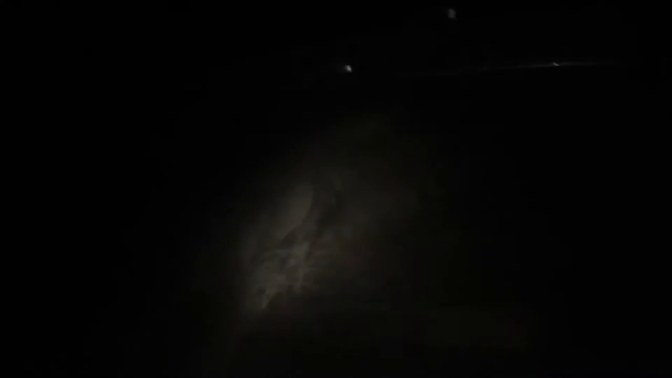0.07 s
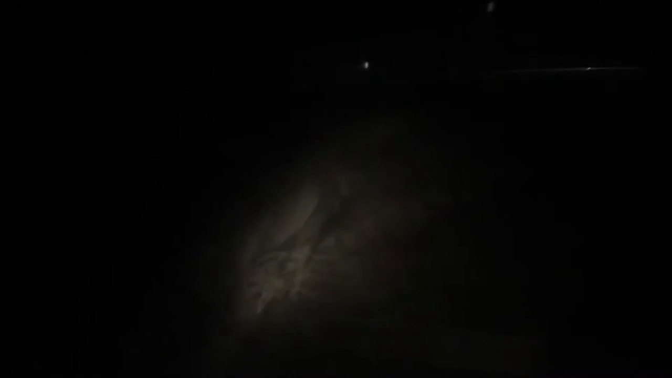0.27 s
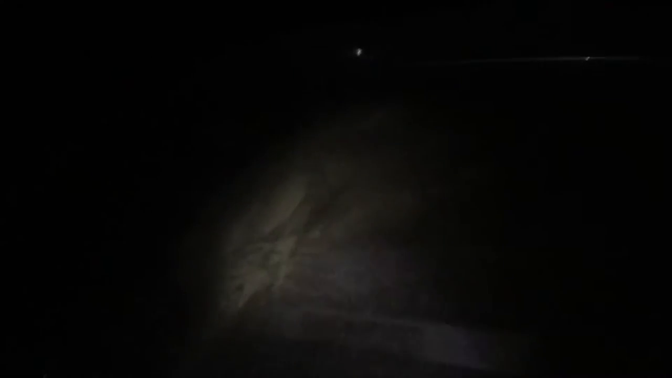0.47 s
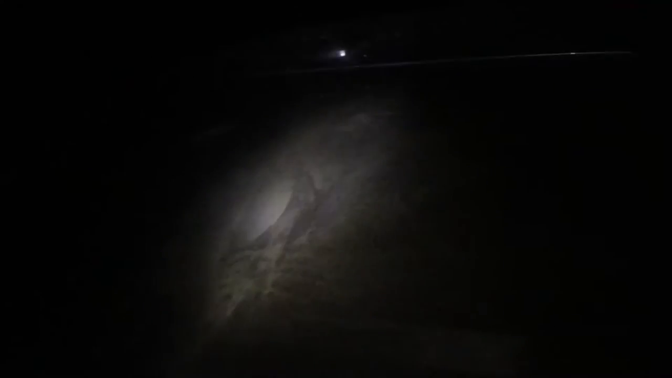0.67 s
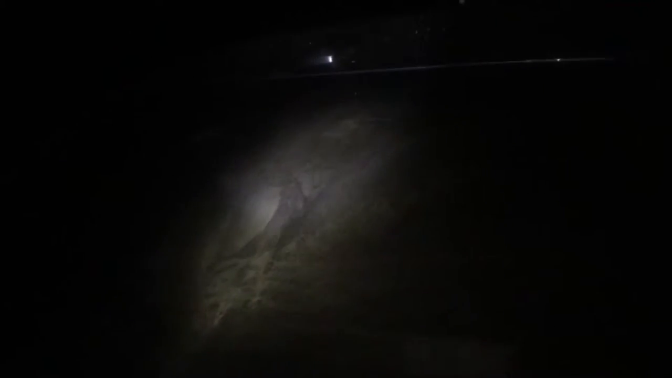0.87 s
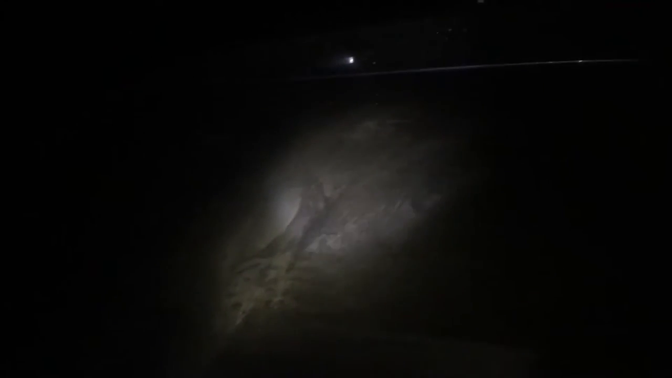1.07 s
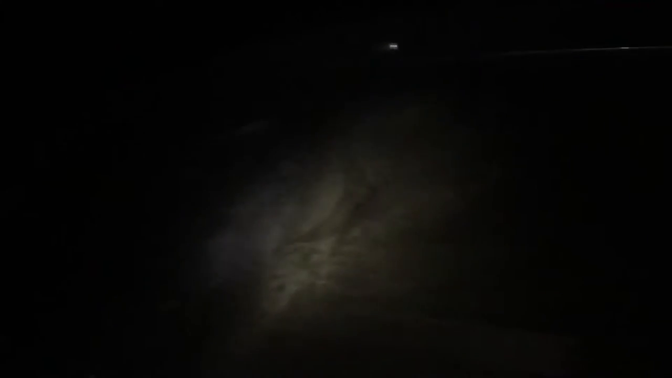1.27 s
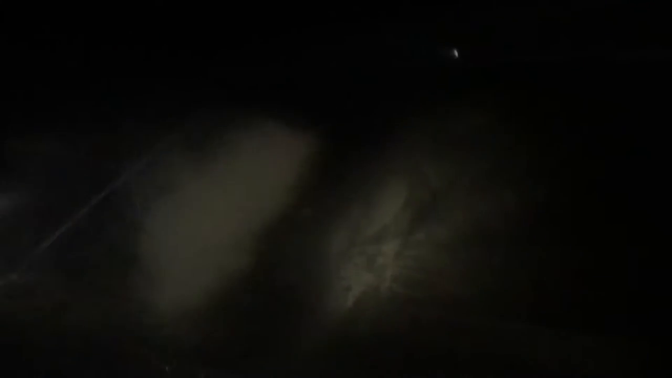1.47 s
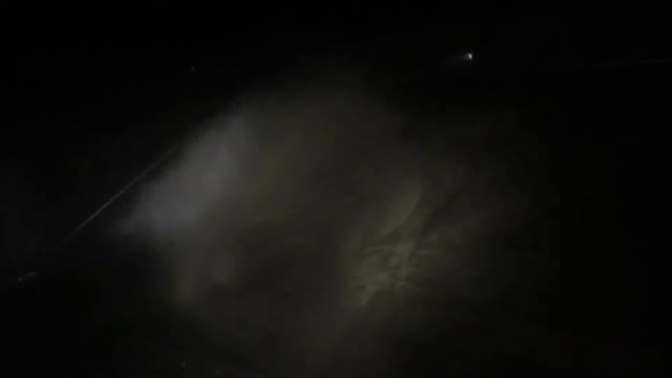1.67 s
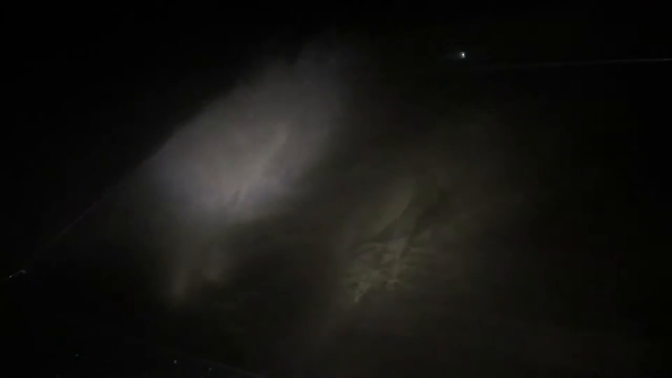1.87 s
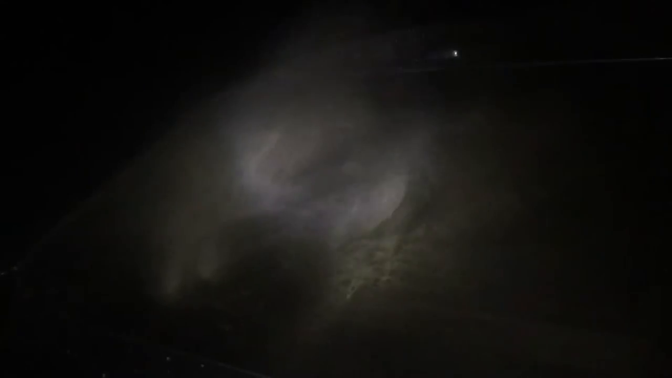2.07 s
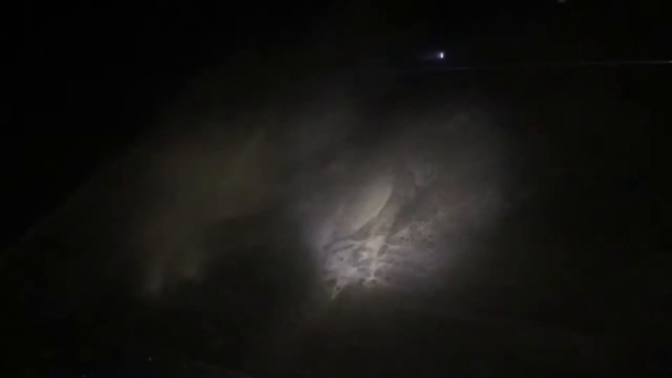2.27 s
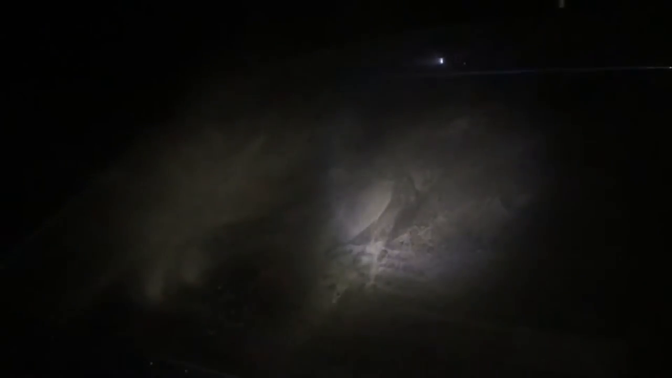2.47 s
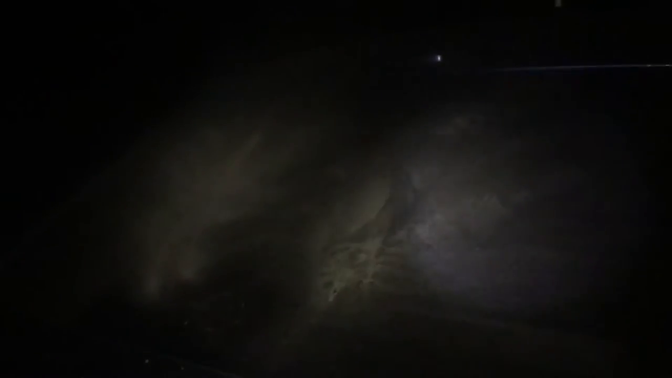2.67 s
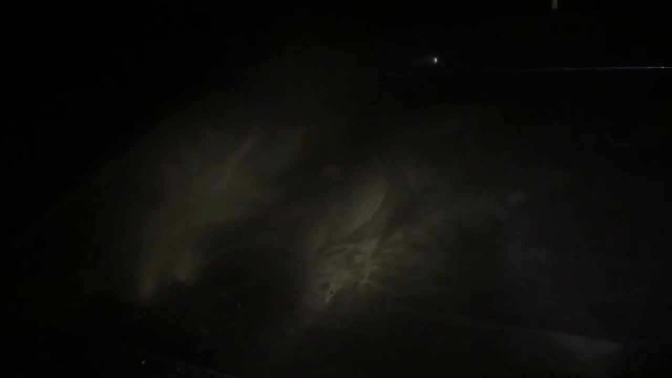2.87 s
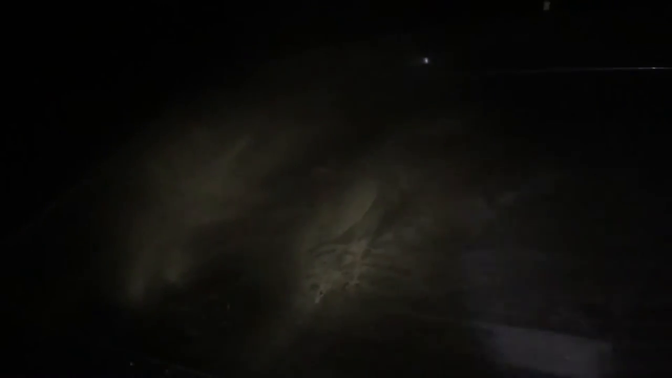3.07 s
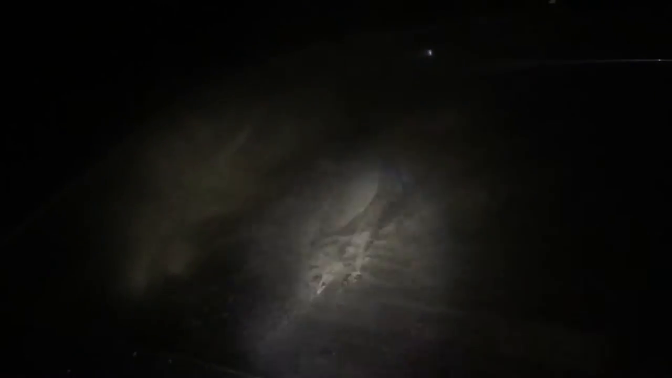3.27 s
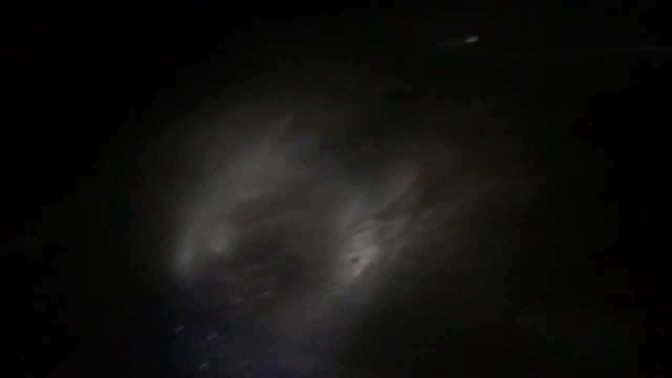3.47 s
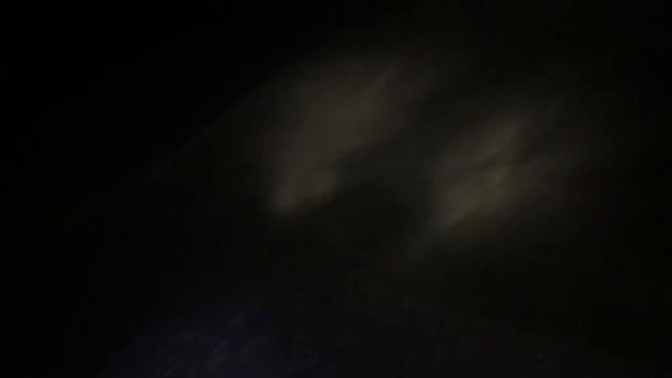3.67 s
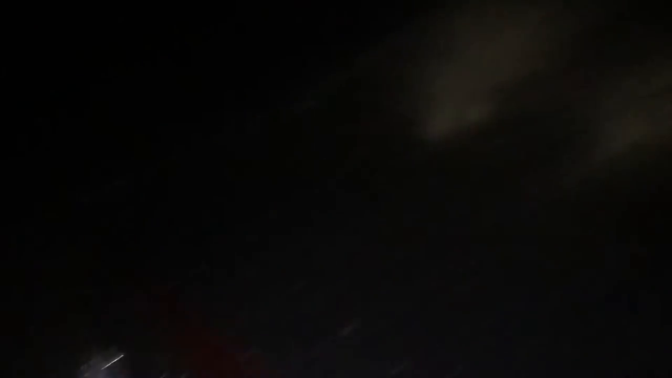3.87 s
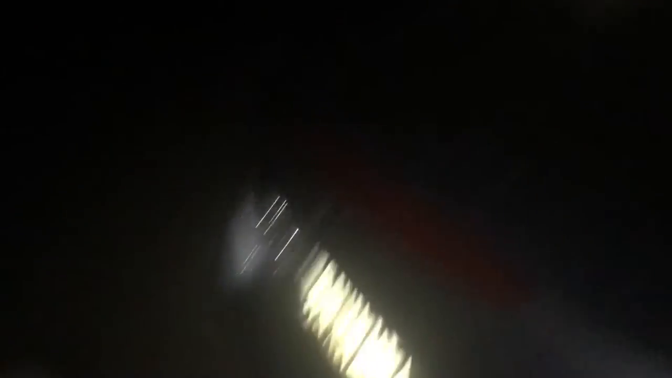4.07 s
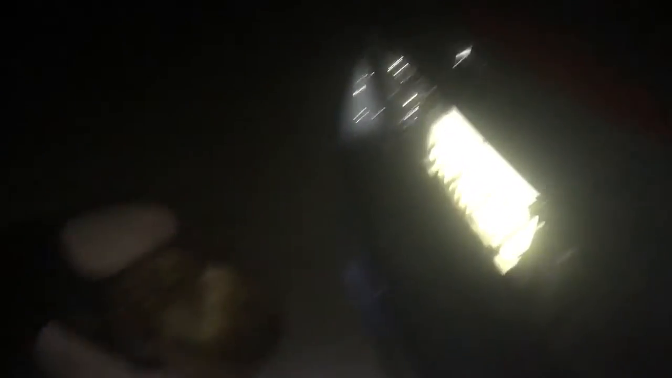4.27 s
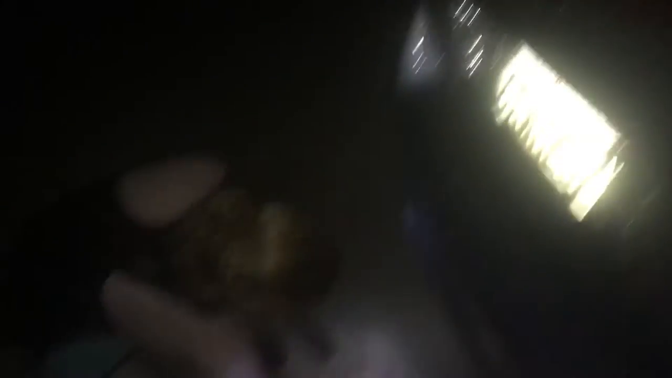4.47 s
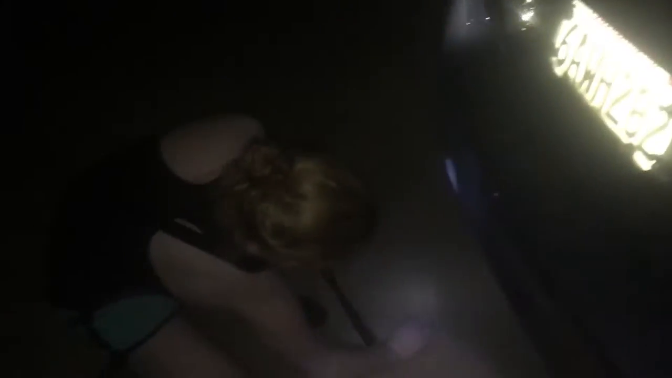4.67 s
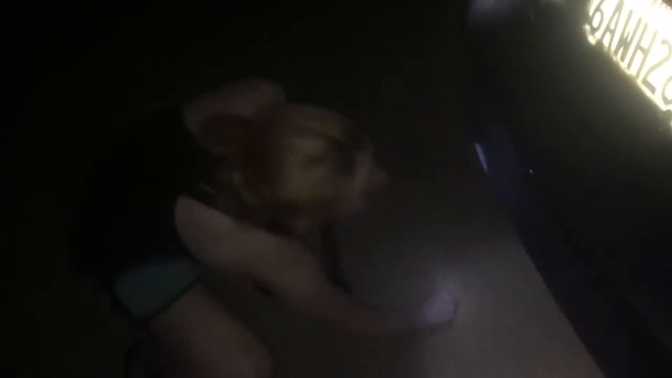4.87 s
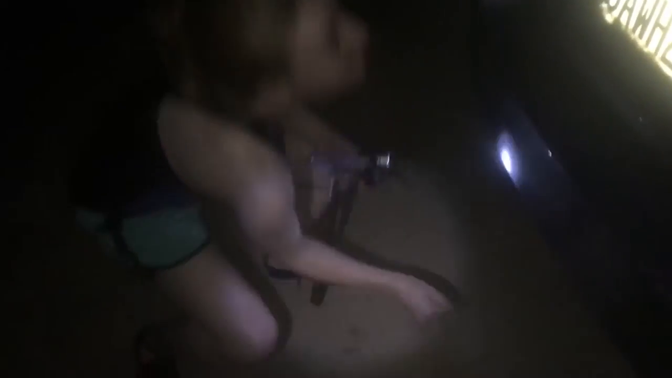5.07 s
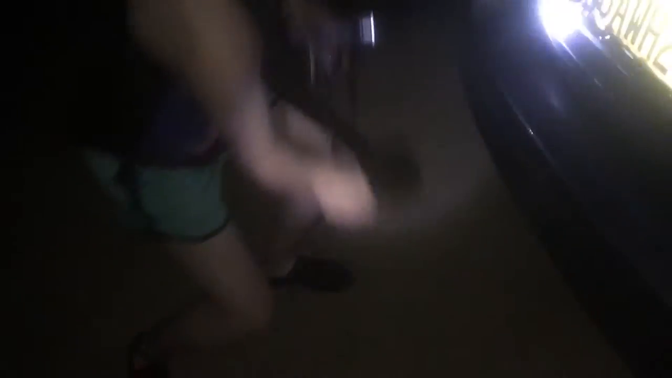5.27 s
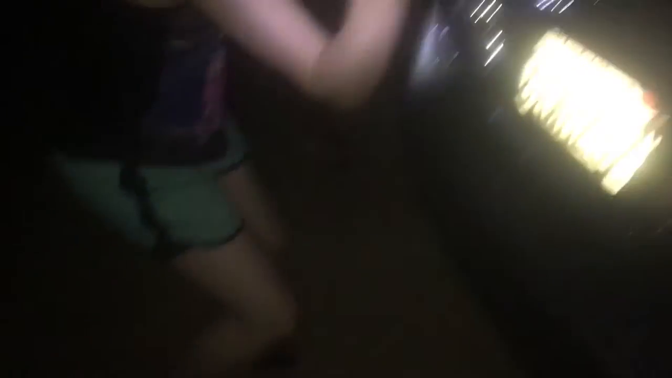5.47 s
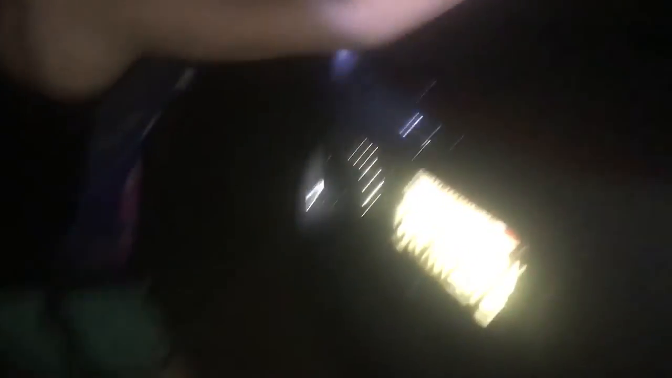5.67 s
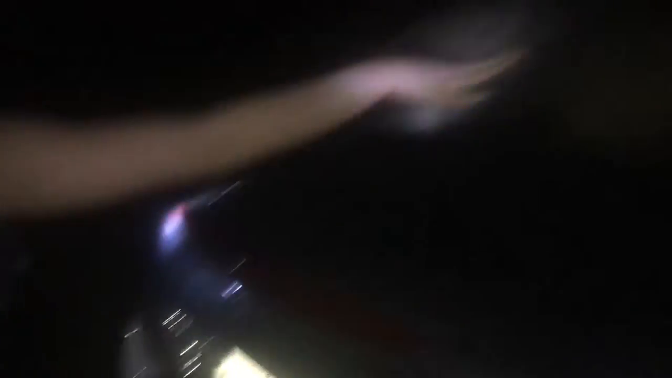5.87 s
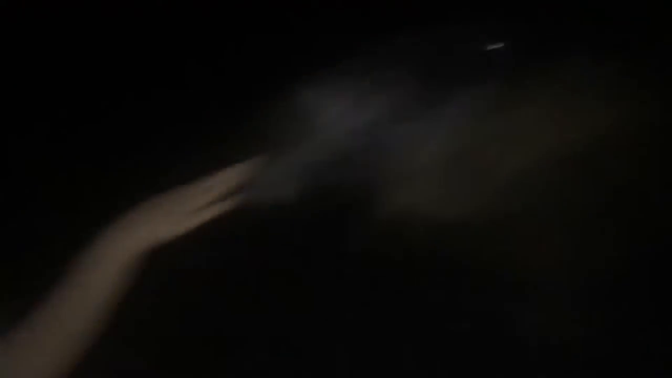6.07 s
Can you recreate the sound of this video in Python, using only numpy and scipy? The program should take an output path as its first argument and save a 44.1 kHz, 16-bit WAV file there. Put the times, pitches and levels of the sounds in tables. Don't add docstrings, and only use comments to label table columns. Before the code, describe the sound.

A quiet night outdoors, heard close: faint hiss, far traffic rumble and a low distant machine drone. At the very start a strap creaks in tiny hollow slips. Light scuffs follow, with stones snapping underfoot around 0.5 to 0.95 seconds and again at 1.2 to 1.35. At about 1.45 a handful of dry grit strikes a car panel: a bright, dense crackling burst over a soft thud and dull metal drumming. Sand hisses down, thinning from 1.6 to 3.4 with crumbs and specks ticking. From 3 to 5.4 a hand scrapes and scoops grit quietly, small stones clicking, especially near 4 and 5.3. Light rattles and scuffs lead to 5.84, when a second handful lands, more abrupt and harder, with a sharp knock, thud and bursting clods. Sandy hiss and scattered crumbs continue until the end, just after 6.1.

```python
import sys
import numpy as np
from scipy import signal
from scipy.fft import rfft, irfft, next_fast_len
from scipy.io import wavfile
from scipy.ndimage import uniform_filter1d, map_coordinates

SR = 44100
rng = np.random.default_rng(int(sys.argv[2]) if len(sys.argv) > 2 else 0)


def makeup_ratio(level_db):
    decades = np.asarray(level_db, float) / 20
    return 10 ** decades


def to_wav(sig):
    pcm = np.clip(np.atleast_2d(sig), -1, 1) * 32767
    pcm = np.round(pcm).astype(np.int16)
    wavfile.write(sys.argv[1], SR, pcm.T)


N = 269451

# frequency in Hz, level in dB per Hz.
NIGHT_COLOUR = [(20, -45), (35, -18), (55, -3.5), (80, -4.5), (120, -6.5), (170, -21.5), (250, -23),
                (420, -32.5), (3000, -47), (10000, -44.5), (16000, -52.5)]
# start in
# seconds, peak in dB, ring in Hz, T60 in seconds.
STRAP_SLIPS = [
    (0.0144, -35, 1160, 0.015),
    (0.0194, -26, 1350, 0.0063),
    (0.0229, -21.5, 1350, 0.0056),
    (0.0268, -29, 1410, 0.0042),
    (0.031, -34, 1170, 0.011),
    (0.038, -40, 1610, 0.011),
    (0.044, -38, 1490, .008),
    (0.0523, -26, 1350, 0.0053),
    (0.0595, -35, 900, .005),
    (5.7805, -36, 1090, 0.016),
]
# start
# in seconds, peak in dB, boom in Hz, T60 in seconds.
THUDS = [(1.005, -40, 430, 0.03), (1.468, -38, 96, 0.25), (1.49, -37.5, 390, 0.13), (2.45, -54, 45, 0.078),
         (2.56, -42.5, 53, 0.16), (3.098, -32.5, 57, 0.048), (3.4, -50, 59, .06), (3.885, -44, 57, 0.065),
         (3.78, -46, 70, .08), (3.7, -53, 110, 0.072), (3.255, -44.5, 242, 0.096),
         (5.39, -40.5, 705, 0.065), (5.845, -24, 116, 0.092), (5.847, -24, 3220, 0.015),
         (5.87, -40, 48, 0.3), (5.846, -35, 286, 0.12)]
# start in seconds, peak in dB, ring in Hz, spit of grit over it in dB.
TRODDEN_STONES = [(0.228, -43.5, 1370, -19), (0.5007, -30, 1700, -25), (0.5059, -28, 1800, -19),
                  (0.526, -38, 1660, -15), (0.565, -42, 1620, -26), (0.6047, -43.5, 1730, -4),
                  (0.625, -42.5, 1500, -18), (0.7, -36.5, 1840, -12), (0.719, -28.5, 1810, -14),
                  (0.7387, -23, 2100, -15.5), (0.744, -26.5, 1970, -9.5), (0.7558, -25, 1940, -10),
                  (0.787, -31, 1670, -6.5), (0.8101, -29, 1700, -17), (0.826, -37, 1880, -16),
                  (0.887, -39, 1770, -14), (0.9184, -49, 2010, 4.5), (0.951, -31.5, 2000, -10.5),
                  (1.2424, -33, 1710, -8), (1.267, -36, 1350, -10), (1.3053, -31, 1900, -22),
                  (1.3076, -22.5, 1380, -23.5), (1.3117, -43, 1250, -20), (1.3145, -41, 1650, -20),
                  (1.324, -38, 1900, -21), (1.3263, -25.5, 1320, -29), (1.3292, -30, 1560, -30),
                  (1.3378, -39, 1800, -21), (1.172, -54, 1800, -3), (1.351, -49, 1700, -12),
                  (1.4755, -25, 1480, -30), (1.483, -30, 1530, -31), (1.495, -27, 1330, -30),
                  (1.609, -36, 1440, -32), (1.618, -33.5, 1490, -30), (1.344, -36, 1580, -31),
                  (1.364, -48, 1500, -24), (1.377, -44, 1490, -20)]
# start in
# seconds, peak in dB, ring in Hz, spit of grit over it in dB.
SCOOPED_STONES = [(3.11, -31, 2360, -4), (3.858, -41.5, 1110, -17), (3.862, -39, 1460, -20),
                  (3.936, -37, 2100, -11), (3.952, -32, 1630, -21), (3.9714, -37, 1330, -22),
                  (3.98, -38.5, 920, -20), (3.9895, -31, 1920, -19), (4.1769, -34, 1580, -13),
                  (4.7524, -30, 2290, -15), (4.7935, -30, 2380, -21), (3.012, -38.5, 1090, -20),
                  (3.2082, -34, 2200, -17), (3.2557, -29, 2700, -20), (3.259, -45, 1010, -20),
                  (3.263, -48, 900, -20), (3.274, -41, 2200, -20), (5.0296, -46, 1200, -2.5),
                  (5.092, -55.5, 1490, 10.5), (5.107, -64.5, 1510, 18), (5.2762, -40, 1610, -10),
                  (5.268, -47, 1290, -19), (5.2778, -35, 2300, -12), (5.2795, -49, 1110, -11),
                  (5.308, -35, 2300, -20), (5.331, -36, 2200, -20), (5.339, -36, 2600, -15),
                  (5.348, -45, 1900, -12), (5.359, -56, 1400, -15), (5.298, -23.5, 1800, -22),
                  (5.301, -39, 1870, -24), (5.343, -46, 1500, -15), (5.364, -42.5, 2500, -4),
                  (5.4, -49, 746, -20), (5.42, -45.5, 750, -17), (5.321, -37, 1630, -15),
                  (5.3269, -30.5, 1750, -15), (5.376, -35.5, 1990, -3)]
# start in seconds, peak in dB, ring in Hz, spit over it in dB.
SWUNG_STONES = [(5.569, -45, 1230, -5), (5.584, -53.5, 1300, 10), (5.6067, -45, 1120, -8),
                (5.664, -51, 1500, 3), (5.732, -30, 2100, -18), (5.7545, -33, 1950, -23),
                (5.781, -40, 1900, -23), (5.899, -29, 1190, -25), (6.035, -34, 1500, -25),
                (6.0077, -33.5, 1100, -25), (5.7185, -47, 1500, -15), (5.722, -37, 2100, -15),
                (5.798, -45, 1900, -17), (5.812, -46, 1500, -14), (5.846, -14, 2660, -24),
                (5.973, -33, 2240, -20), (6.0069, -23, 1980, 0), (5.77, -55, 1650, 8),
                (6.054, -20, 1810, -30)]
# start in seconds, length in seconds, level in dB, grit over it in dB.
SCUFFS = [(0.0, 0.052, -54.5, -6.5), (0.155, 0.021, -57.5, -17), (0.276, 0.024, -60.5, -6),
          (0.323, 0.061, -58.5, -9.5), (0.498, 0.0078, -49.5, -28), (0.699, .015, -58.5, -15),
          (0.718, 0.036, -51, -8), (0.745, 0.048, -47.5, -10.5), (0.93, 0.039, -59.5, -7),
          (0.9, 0.035, -72, -5), (0.989, 0.019, -61, -2), (1.191, 0.016, -47, -11.5),
          (1.223, 0.028, -47.5, -12.5), (1.29, 0.038, -61, -7), (3.255, 0.0065, -48, -6),
          (3.526, 0.08, -62.5, 4), (3.857, 0.013, -55, -10), (3.921, 0.02, -54, -12),
          (3.965, 0.047, -51, -23), (4.091, 0.092, -52, -22), (4.245, 0.11, -53, -25),
          (4.39, 0.057, -57, -25), (4.684, 0.021, -63, -25), (4.882, 0.042, -62, -16),
          (5.065, 0.046, -64, -0.5), (5.235, 0.1, -62, -4.5), (5.34, 0.036, -62, -6.5),
          (5.383, 0.035, -48, -2.5), (5.568, 0.035, -58.5, -12), (5.717, 0.0066, -53.5, -7),
          (5.706, 0.047, -59, -4), (5.775, 0.021, -46.5, -11)]
# time in seconds, level in dB.
STIR = [(0, -60.5), (.45, -62.5), (.69, -68), (.9, -68), (1.1, -73.5), (1.43, -68.5), (3.4, -61),
        (3.8, -59), (4.8, -62.5), (5, -67), (5.18, -70.5), (5.5, -67.5), (5.83, -64)]
# frequency in Hz, level in dB per Hz.
SCUFF_COLOUR = [(60, -73), (150, -13.5), (300, -2), (600, -6), (1000, -2), (1750, -1.5), (2500, -1),
                (3700, -10.5), (7000, -43.5)]
# time in seconds, flow in dB, coarse sand over fine in dB.
SAND_FLOWS = [
    [(1.47, -51, -22), (1.62, -39.5, -11.5), (1.82, -39.5, -7), (2.23, -44.5, -8.5), (2.58, -45.5, -1.5),
     (3.15, -56.5, 1), (3.4, -62.5, -2), (3.5, -73, 7)],
    [(3.4, -60.5, -31), (3.52, -59.5, 5), (3.82, -61, -2), (4.03, -57.5, 1.5), (4.2, -50, -7),
     (4.47, -53.5, 3), (4.52, -61.5, 2), (4.66, -55.5, 2), (4.81, -56.5, 3.5), (4.865, -55.5, 1),
     (4.89, -76, 7), (4.97, -70.5, 5)],
    [(5.85, -53, -6), (5.89, -33.5, -12), (5.95, -37.5, -2), (6.03, -45.5, -6.5), (6.08, -43.5, -1),
     (6.11, -45.5, -8)],
]
# dust at the start in dB, dust at the end in dB.
FLOW_DUST = [(-10.5, -2), (-5.5, -9), (-17, -11)]
# frequency in Hz, level in dB per Hz.
SLIDE_COLOUR = [(150, -19.5), (280, -7), (520, -8.5), (1000, -3), (1500, -3.5), (2300, 0), (3000, -4),
                (4500, -14.5), (7000, -51)]
# start in seconds, peak in dB, centre in Hz, knock over it in dB.
CRUMBS = [(1.7454, -29, 5920, -22), (1.766, -26, 6620, -20), (1.792, -27, 7000, -18),
          (1.824, -18, 6600, -25), (1.852, -27.5, 7020, -24), (1.9216, -28, 5660, -10),
          (1.9336, -27.5, 5860, -14), (1.946, -31, 8550, -5), (1.983, -29.5, 6530, -20),
          (2.046, -26, 5470, -25), (2.059, -27, 6000, -13), (2.162, -31.5, 5500, -18),
          (2.304, -26.5, 6260, -7), (2.308, -28, 6000, -12), (2.3764, -27, 6150, -23),
          (2.4651, -30.5, 6450, -20), (2.49, -27, 6600, -20), (2.546, -26, 7960, -3),
          (2.627, -26.5, 8890, -14), (2.7064, -27, 8500, -20), (2.717, -28.5, 5830, -20),
          (2.758, -32.5, 5800, -18), (2.9285, -27.5, 8250, -11), (3.073, -33.5, 9500, -18),
          (3.081, -35.5, 6000, 0.5), (3.0963, -37, 7000, -10), (3.179, -39, 6050, -10),
          (3.255, -33, 6040, 4.5), (3.325, -40, 9000, -20), (3.404, -38.5, 6000, 0),
          (3.4155, -33, 9500, -18)]
# start in seconds, peak in dB, centre in Hz.
SPECKS = [(0.5231, -49, 9000), (0.54, -59, 8000), (0.5575, -51, 11000), (0.5849, -58, 9000),
          (0.6046, -56, 9000), (0.637, -54, 3500), (0.8493, -52, 6000), (0.876, -56, 7000),
          (0.909, -51, 8000), (0.925, -54, 7000), (1.693, -24, 5540), (1.703, -24.5, 6500),
          (1.713, -26, 6000), (1.7344, -30, 5460), (1.797, -23.5, 6000), (1.869, -30, 6500),
          (1.913, -28.5, 6000), (1.941, -25, 6000), (1.995, -40, 6500), (2.11, -36, 5000),
          (2.313, -29, 6000), (2.398, -42, 5000), (2.438, -36, 7000), (2.548, -36, 9000),
          (2.6654, -35, 7000), (2.791, -34, 9000), (2.8225, -37.5, 9000), (2.843, -36, 11000),
          (2.8993, -35, 11400), (2.905, -38, 6000), (2.968, -43, 7000), (3.0003, -34.5, 8470),
          (3.055, -42, 4500), (3.163, -43.5, 3500), (3.19, -42, 11000), (3.164, -39, 8000),
          (3.009, -38, 10000), (3.202, -53, 5000), (3.21, -37.5, 5800), (3.2443, -45, 5270),
          (3.318, -37, 12000), (3.3273, -33.5, 4530), (3.368, -52, 5500), (3.5015, -40.5, 6890),
          (4.371, -39, 9000), (4.438, -47, 9000), (4.5101, -48, 9000), (4.528, -42.5, 4000),
          (4.55, -45, 9000), (4.8997, -52, 2440), (4.921, -51, 4970), (1.298, -50, 3300),
          (1.395, -56, 4500), (1.2585, -55, 5500), (3.408, -42, 3350), (5.527, -51, 12000),
          (5.77, -43, 9970), (5.7885, -50.5, 9000), (5.33, -50, 4500), (5.348, -50, 4000),
          (1.3375, -61, 2980)]
# start in seconds, length in seconds, grit in dB, finest dust over grit in dB.
THROWS = [
    (1.445, .01, -44.5, -6),
    (1.454, 0.013, -31, -7.5),
    (1.463, 0.043, -25, -10),
    (1.493, 0.048, -29, -7.5),
    (5.8415, .002, -37, -1),
    (5.8439, 0.0054, -20.5, -20),
]
# frequency in Hz, level in dB per Hz.
GRIT_COLOUR = [(600, -80), (1500, -35.5), (2900, -10.5), (4000, -7), (5500, 0), (7500, -3), (9400, -1.5),
               (10500, -3), (12500, -49)]
# frequency in Hz, level in dB per Hz.
DUST_COLOUR = [(8000, -48), (10300, 1.5), (11500, -1.5), (13000, -2), (15500, -5.5), (16000, -9.5)]
# frequency in Hz, level in dB per Hz.
BOOM_COLOUR = [(40, -71), (80, -38), (130, 1.5), (240, -1), (400, 4), (600, -29.5), (1000, -18.5),
               (3000, -83)]
# start in seconds, peak in dB, centre in Hz, fall-off at one octave in dB.
CLODS = [(1.454, -29.5, 6500, 2), (1.459, -14.5, 7530, 16.5), (1.473, -9.5, 7470, 18),
         (1.4806, -12, 7640, 16), (1.4915, -13, 7340, 16), (1.5002, -9.5, 7270, 13.5),
         (1.5105, -18, 6520, 15), (1.5305, -27, 7060, 9.5), (1.5232, -20, 6640, 19.5),
         (1.5514, -18, 6960, 11), (1.5906, -32, 5900, 10.5), (1.6142, -21, 6400, 12.5),
         (1.6262, -24, 6440, 10.5), (1.6685, -23.5, 6730, 14.5), (1.677, -29.5, 6520, 7),
         (2.0927, -31, 5570, 18), (2.606, -31, 5600, 8.5), (3.265, -35, 4960, 6), (4.0234, -41, 8000, 11),
         (5.8408, -36, 6000, 1), (5.8437, -26, 6500, 6), (5.8445, -19, 2800, 19.5), (5.8495, -16, 2900, 17),
         (5.8535, -23, 2930, 22), (5.8462, -7.5, 6000, 18), (5.8478, -8.5, 6140, 14.5),
         (5.8505, -20.5, 3360, 26), (5.856, -14, 4000, 17), (5.864, -27.5, 6000, 8),
         (5.891, -24.5, 5500, 9), (5.939, -25.5, 8000, 2), (5.956, -35, 9000, 6), (5.986, -31.5, 8000, 5),
         (5.913, -13.5, 5140, 9), (5.9251, -20.5, 7600, 9), (5.9725, -19.5, 5280, 7.5),
         (6.0063, -31, 5450, 5.5), (6.0396, -32, 6140, 23), (6.0558, -28, 6430, 22),
         (6.0739, -16.5, 5750, 12), (6.0855, -16.5, 6000, 47), (6.1081, -22, 6830, 13)]
# frequency in Hz, level in dB.
MIC_PORT = [(25, -8), (45, 0), (2300, -1.5), (2900, -3), (3800, 1.5), (9500, -3.5), (10400, -8.5),
            (11300, -0.5)]

THROW_RISE_DB_S, THROW_FALL_DB_S = 13999, 331.5
SCUFF_RISE_DB_S, SCUFF_FALL_DB_S = 1600, 658
THROW_COARSE_DB = -14.5
STIR_GRIT_DB, SCUFF_DUST_DB, STIR_DUST_DB = -5.5, -9.5, -8.5
CRUMB_SLOPE_DB, SPIT_SLOPE_DB, SPECK_SLOPE_DB = 11, 6, 7.5
CRUMB_RING_HZ, SPIT_HZ = 2100, 4700
SNAP_CYCLES = 5


def unit(x):
    return x / np.sqrt(np.mean(x ** 2) + 1e-20)


def gain(points, f):
    hz, db = np.transpose(points)
    return makeup_ratio(np.interp(np.log(f + 1), np.log(hz), db))


def filtered(x, response):
    m = 2 * next_fast_len(len(x) // 2 + 4096)
    spectrum = rfft(x, m) * response(np.fft.rfftfreq(m, 1 / SR))
    return irfft(spectrum, m)[:len(x)]


def causal(size):
    cepstrum = irfft(np.log(size + 1e-6))
    cepstrum[1:len(size) - 1] *= 2
    cepstrum[len(size):] = 0
    return np.exp(rfft(cepstrum))


def coloured(x, spectrum):
    return unit(filtered(x, lambda f: causal(gain(spectrum, f))))


def wobble(rate):
    return map_coordinates(rng.standard_normal(N // 100), [np.arange(N) * rate / SR])


def patter(rate, spread_db, fall_s):
    chance = rng.random(N)
    size = np.minimum(rng.exponential(size=N), 3)
    landings = (chance < rate / SR) * makeup_ratio(2 * spread_db * size)
    fade = np.exp(-1 / (fall_s * SR))
    power = signal.lfilter([1], [1, -fade], landings)
    return np.sqrt(np.abs(power) / power.mean())


def patchy(depth_db):
    z = signal.stft(rng.standard_normal(N + 512), nperseg=512)[2]
    field = uniform_filter1d(rng.standard_normal(z.shape), size=7, axis=0)
    field = uniform_filter1d(field, size=30, axis=1)
    return signal.istft(z * makeup_ratio(depth_db * np.tanh(unit(field))), nperseg=512)[1][:N]


def stream(spectrum, clumps, smooth, lumpy_db):
    size = np.sqrt(smooth + (1 - smooth) * clumps ** 2)
    size = size * makeup_ratio(lumpy_db * wobble(25))
    return coloured(size * patchy(depth_db=2.0), spectrum)


def ticks(count, mean_hz, cycles, spread_db):
    when, pitch, size = rng.random((3, count, 1))
    hz = mean_hz * 2 ** (1.6 * (pitch - 0.5))
    k = np.arange(96)
    ring = np.sin(2 * np.pi * hz * k / SR) * np.exp(-hz * k / SR / cycles)
    ring = ring * makeup_ratio(-spread_db * np.log(size + 0.016))
    places = k + (when * N).astype(int)
    return unit(np.bincount(places.ravel(), ring.ravel(), N)[:N])


def knocks(table, count, attack, upper, crumbs, gain_db):
    out, t = np.zeros(N + SR), np.arange(count) / SR
    for s, db, hz, t60 in table:
        ring = np.sin(2 * np.pi * hz * t) + upper * np.sin(2 * np.pi * 1.48 * hz * t)
        band = signal.butter(2, [0.92 * hz, 1.55 * hz], "bandpass", fs=SR, output="sos")
        rattle = unit(signal.sosfilt(band, rng.standard_normal(count)))
        blow = ring * makeup_ratio(-60 * t / t60) + crumbs * rattle * makeup_ratio(-18 * t / t60)
        onset = 1 - np.exp(-(t / attack) ** 2)
        out[round(s * SR):][:count] += makeup_ratio(db + gain_db) * onset * blow
    return out[:N]


def swells(t, table, rise_db_s, fall_db_s):
    s, length, db, over_db = np.transpose(table)[:, :, None]
    rise = rise_db_s * np.maximum(s - t, 0)
    fall = fall_db_s * np.maximum(t - s - length, 0)
    power = makeup_ratio(2 * (db - rise - fall))
    return power.sum(axis=0), (power * makeup_ratio(2 * over_db)).sum(axis=0)


def movement():
    t = np.arange(0, N, 16) / SR
    thrown, thrown_dust = swells(t, THROWS, THROW_RISE_DB_S, THROW_FALL_DB_S)
    scuffed, kicked = swells(t, SCUFFS, SCUFF_RISE_DB_S, SCUFF_FALL_DB_S)
    stir = makeup_ratio(2 * np.interp(t, *np.transpose(STIR)))
    flow, coarse, fine = np.zeros((3, len(t)))
    for table, dust_db in zip(SAND_FLOWS, FLOW_DUST):
        s, db, coarse_db = np.transpose(table)
        moving = (t >= s[0]) & (t <= s[-1])
        flow_db = np.interp(t, s, db)
        flow = flow + moving * makeup_ratio(2 * flow_db)
        coarse = coarse + moving * makeup_ratio(2 * np.interp(t, s, db + coarse_db))
        fine = fine + moving * makeup_ratio(2 * (flow_db + np.interp(t, s[[0, -1]], dust_db)))
    resting = stir * makeup_ratio(2 * STIR_GRIT_DB)
    scuff = scuffed + stir + thrown * makeup_ratio(2 * THROW_COARSE_DB)
    grit = thrown + flow + kicked + resting
    dust = thrown_dust + fine + kicked * makeup_ratio(2 * SCUFF_DUST_DB) + resting * makeup_ratio(2 * STIR_DUST_DB)
    return [np.interp(np.arange(N) / SR, t, np.sqrt(p)) for p in (scuff, coarse, grit, dust)]


def night():
    turns = np.cumsum(56 + 5 * wobble(5.4)) / SR
    drone = makeup_ratio(-64.5 + 1.5 * wobble(13)) * np.sin(2 * np.pi * turns)
    overtone = makeup_ratio(-75.0) * np.sin(2 * np.pi * 241 * np.arange(N) / SR + wobble(19))
    return makeup_ratio(-64.0) * coloured(rng.standard_normal(N), NIGHT_COLOUR) + drone + overtone


def strap_creak():
    return knocks(STRAP_SLIPS, count=SR // 16, attack=0.00055, upper=0.55, crumbs=0.094, gain_db=7.0)


def soft_thuds():
    return knocks(THUDS, count=SR // 4, attack=0.0026, upper=0, crumbs=0.19, gain_db=-2.0)


def snapping_stones():
    snaps = [(s, db, hz, SNAP_CYCLES / hz) for s, db, hz, _ in TRODDEN_STONES + SCOOPED_STONES + SWUNG_STONES]
    snaps += [(s, db + knock_db, CRUMB_RING_HZ, SNAP_CYCLES / CRUMB_RING_HZ) for s, db, _, knock_db in CRUMBS]
    return knocks(snaps, count=SR // 16, attack=0.00039, upper=0.25, crumbs=0.16, gain_db=10.0)


def ground_and_sand(scuffing, sliding, clumps):
    scuff = stream(SCUFF_COLOUR, clumps, smooth=0.52, lumpy_db=1.0)
    gravel = ticks(count=1500, mean_hz=1700, cycles=0.93, spread_db=1.0)
    gravel = gravel * (makeup_ratio(-10.5) * scuffing + makeup_ratio(-27.0) * sliding)
    slide = stream(SLIDE_COLOUR, clumps, smooth=0.58, lumpy_db=1.64)
    return scuffing * scuff + sliding * slide + gravel


def grit_on_panel(pelting, dusting, clumps):
    grit = stream(GRIT_COLOUR, clumps, smooth=0.56, lumpy_db=0.66)
    grit = grit + makeup_ratio(-12.0) * ticks(count=4000, mean_hz=6000, cycles=0.8, spread_db=0.0)
    dust = stream(DUST_COLOUR, clumps, smooth=0.66, lumpy_db=0.5)
    boom = stream(BOOM_COLOUR, clumps, smooth=0.4, lumpy_db=1.3)
    return makeup_ratio(-0.7) * pelting * grit + makeup_ratio(1.0) * dusting * dust + makeup_ratio(-17.5) * pelting ** 1.19 * boom


def bursts(table):
    out, t = np.zeros(N + SR), np.arange(SR // 20) / SR
    noises = rng.standard_normal((len(table), len(t)))
    hops = rng.random(len(table))
    for (s, db, hz, slope_db), noise, hop in zip(table, noises, hops):
        puff = filtered(noise, lambda f: makeup_ratio(-abs(slope_db) * np.log2((f + 1) / hz) ** 2))
        puff = puff / np.sqrt(np.mean(puff[:60] ** 2))
        t60 = 0.014 * makeup_ratio(0.12 * (db + 13.5))
        late = t - 0.002 - 0.0014 * hop
        size = makeup_ratio(-60 * t / t60) * (1 - np.exp(-t / 0.0001))
        size = size + (late > 0) * makeup_ratio(-11.0 - 60 * late / t60)
        out[round(s * SR):][:len(t)] += makeup_ratio(db - 4.0) * size * puff
    return out[:N]


def bursting_clods():
    puffs = CLODS + [(s, db, hz, CRUMB_SLOPE_DB) for s, db, hz, _ in CRUMBS]
    puffs += [(s, db, hz, SPECK_SLOPE_DB) for s, db, hz in SPECKS]
    all_stones = TRODDEN_STONES + SCOOPED_STONES + SWUNG_STONES
    puffs += [(s, db + spit_db, SPIT_HZ, SPIT_SLOPE_DB) for s, db, _, spit_db in all_stones]
    return bursts(puffs)


def scene():
    knocking = snapping_stones() + soft_thuds() + strap_creak()
    scuffing, sliding, pelting, dusting = movement()
    panel_clumps = patter(rate=240, spread_db=2.1, fall_s=0.0013)
    ground_clumps = patter(rate=230, spread_db=4.0, fall_s=0.0019)
    ground = ground_and_sand(scuffing, sliding, ground_clumps)
    panel = grit_on_panel(pelting, dusting, panel_clumps) + bursting_clods()
    return (knocking + ground + panel + night())[None]


def low_pass(x):
    return signal.sosfilt(signal.butter(12, 16620, fs=SR, output="sos"), x)


def record(dry):
    top_hz, ceiling = 15950, 0.65
    x = filtered(dry[0], lambda f: gain(MIC_PORT, f) * (f < top_hz))
    x = x / (1 + np.abs(x / ceiling) ** 4) ** (1 / 4)
    return low_pass(x[None])


dry = scene()
out = record(dry)
to_wav(out)
```